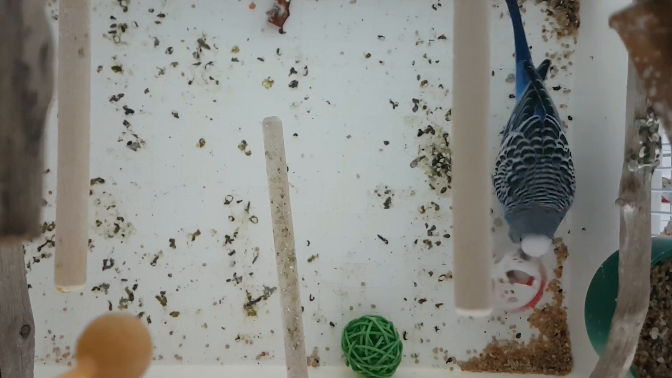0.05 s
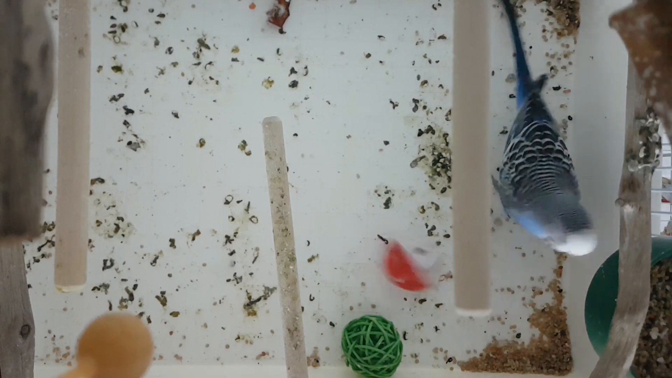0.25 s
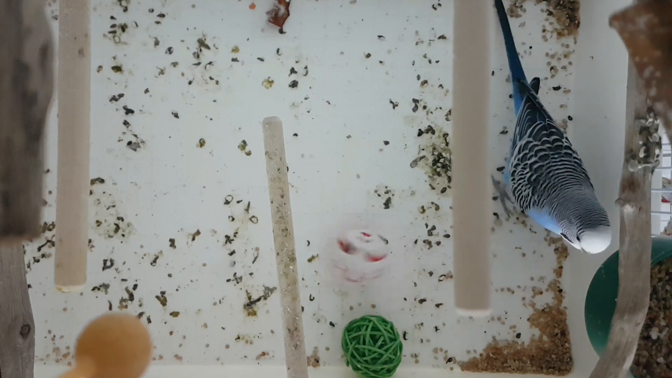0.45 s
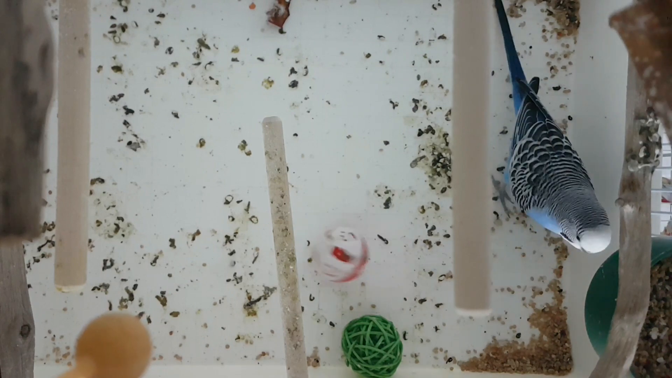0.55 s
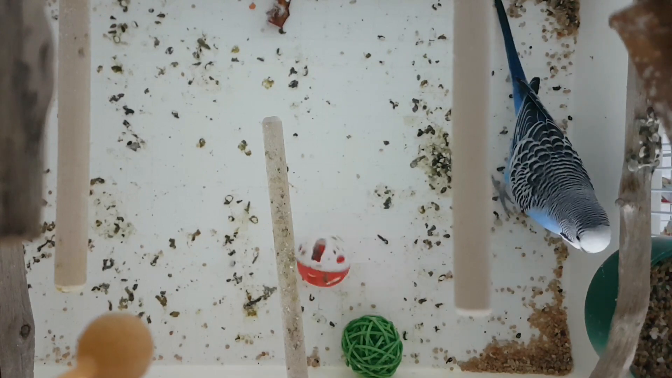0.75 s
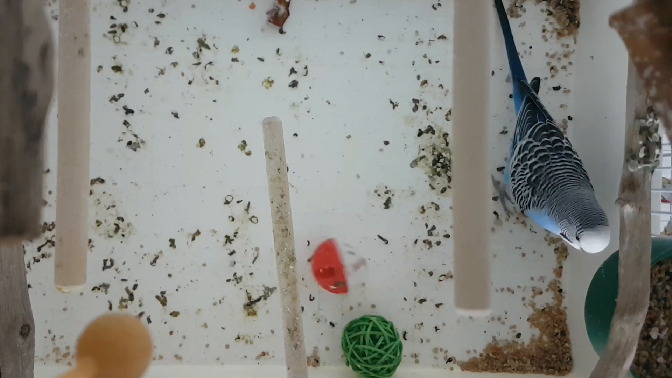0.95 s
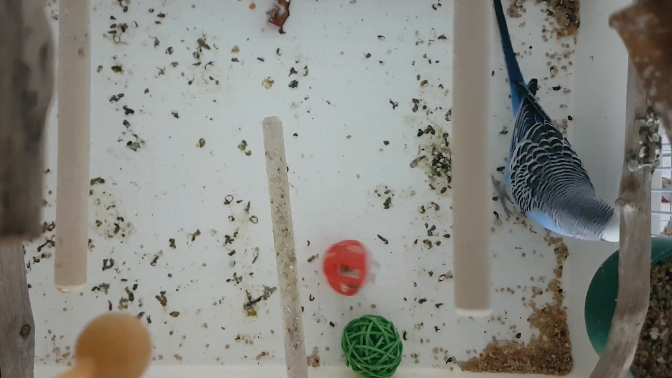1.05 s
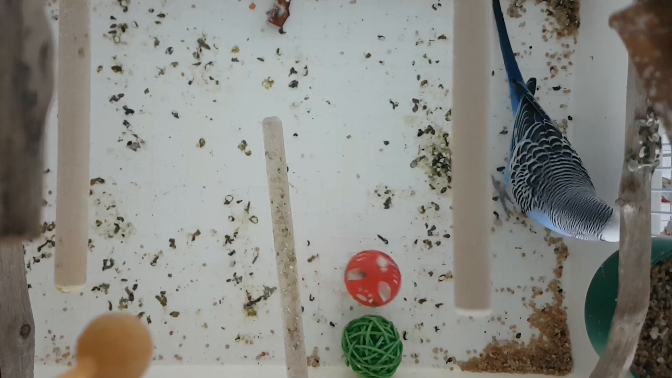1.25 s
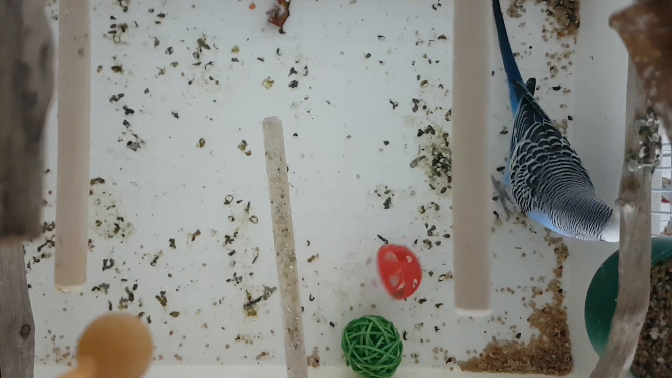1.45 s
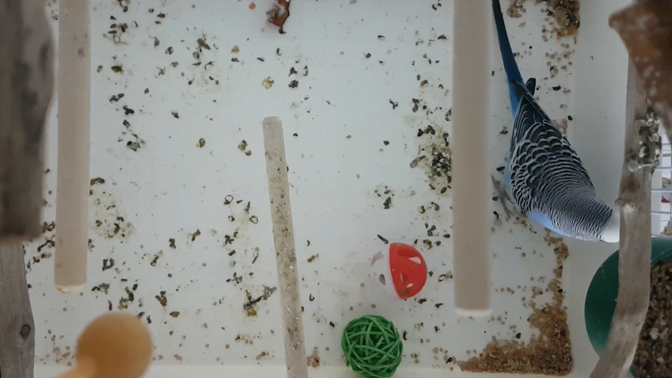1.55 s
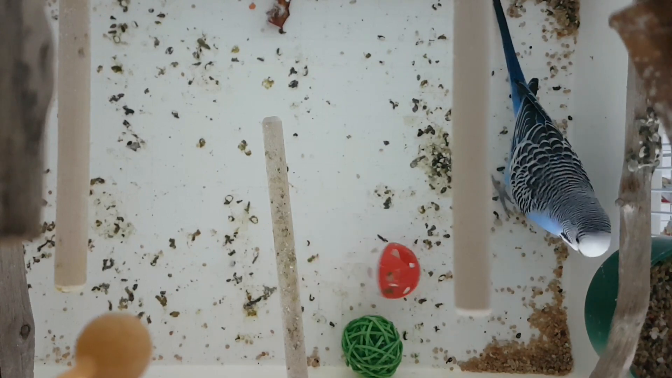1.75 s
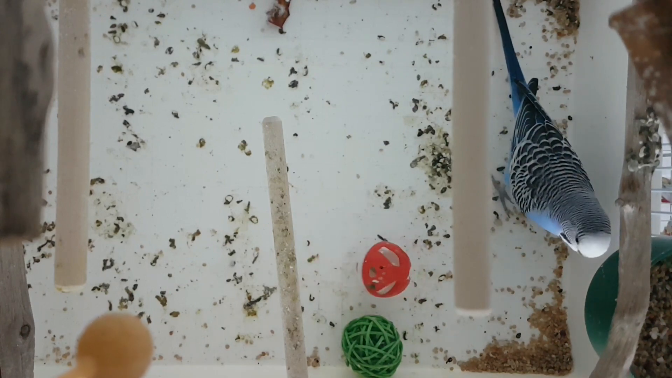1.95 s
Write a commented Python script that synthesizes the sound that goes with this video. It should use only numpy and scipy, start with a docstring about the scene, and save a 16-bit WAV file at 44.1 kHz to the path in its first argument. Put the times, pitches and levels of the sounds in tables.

```python
"""A budgie ends a warble amid scrabbling and flings a hollow plastic ball with a bell inside.
The notes are gliding sines with airy hiss; the bell's two modes give faint, flickering tinkles.
The ball lands on the cage tray, bounces and rolls over husks: clicks ring modes of tray, stand,
shell and husks, with grainy bursts, a dying rattle and fine ticks between the bumps.
A small room of decaying noise answers; a close microphone pair hears it a little from the right."""
import sys
import numpy as np
from scipy import signal
from scipy.fft import rfft, irfft, next_fast_len
from scipy.io import wavfile

SR = 44100
rng = np.random.default_rng(int(sys.argv[2]) if len(sys.argv) > 2 else 0)


def boost(x):
    """Linear amplitude factor 10**(x/20) for a level x in decibels (scalar or array-like)."""
    u = np.asarray(x, float) / 20
    return 10 ** u


def put_to_file(sound):
    """Save the sound as 16-bit audio at rate SR, in the file named by the first command-line argument."""
    columns = np.atleast_2d(sound).T  # one column per channel
    safe = np.clip(columns, -1, 1)
    whole_steps = np.round(safe * 32767)
    wavfile.write(sys.argv[1], SR, whole_steps.astype(np.int16))


N = 90405

# Low modes of the tray. Each row: frequency in Hz, relative level in dB, t60 in seconds.
TRAY_LOW_MODES = [(217, -15, 0.14), (297, -17, 0.1), (335, -17, 0.093), (355, -13, 0.14), (330, -3, 0.012),
                  (411, -27, 0.04), (474, -19, 0.11), (513, -17, 0.15), (609, -24, 0.06)]
# Upper modes of the tray. Each row: frequency in Hz, relative level in dB, t60 in seconds.
TRAY_HIGH_MODES = [(743, -19, 0.06), (780, -16, 0.07), (803, -12, 0.09), (943, -12, 0.07),
                   (1010, -12, 0.04), (1078, -11, 0.09), (1250, -18, 0.05), (1380, -17, 0.04),
                   (1650, -18, 0.02)]
# Modes of the ball's shell. Each row: frequency in Hz, relative level in dB, t60 in seconds when struck.
SHELL_MODES = [(1750, -9, 0.01), (2350, -1, 0.011), (2850, -4, 0.008), (3350, -6, 0.009),
               (5160, -15, 0.012)]
# Modes of the dry husks. Each row: frequency in Hz, relative level in dB, t60 in seconds when struck.
HUSK_MODES = [(7300, -13, .006), (8100, -11, .008), (10800, -12, .006), (12000, -12, .006),
              (14600, -4, .006), (15600, -3, .005)]


def at_hz(points, hz):
    """Read a spectrum on a log-frequency axis."""
    point_hz, value = np.transpose(points)
    return np.interp(np.log(np.maximum(hz, 1)), np.log(point_hz), value)


def rms_one(x):
    """Scale to unit rms."""
    return x / np.sqrt(np.mean(x ** 2) + 1e-20)


def band(x, low_hz, high_hz):
    """Band-pass."""
    return signal.sosfilt(signal.butter(2, [low_hz, high_hz], "band", fs=SR, output="sos"), x)


def steep(x, low_hz, high_hz):
    """Band-pass with steep skirts."""
    return band(band(x, low_hz, high_hz), low_hz, high_hz)


def waver(depth_db, rate_hz):
    """A gain that wanders at random: low-passed noise, in dB, of the given rms depth."""
    r = np.exp(-2 * np.pi * rate_hz / SR)
    drift = signal.lfilter([1], [1, -2 * r, r * r], rng.standard_normal(N + 4000))
    return boost(depth_db * rms_one(drift[4000:]))


def clicks(s, gains):
    """An impulse train over a tiny offset."""
    out = np.full(N, 1e-18)
    np.add.at(out, np.clip((np.asarray(s) * SR).astype(int), 0, N - 1), gains)
    return out


def grains(rate, size_db):
    """Random clicks, so many per second, of uneven size and sign."""
    happens = rng.random(N) < rate / SR
    size = boost(size_db * np.minimum(rng.exponential(1, N), 4))
    return happens * size * rng.choice([-1, 1], N) + 1e-18


def ring(x, hz, t60):
    """A two-pole resonator: a unit click sets a dying sine of about unit height ringing."""
    r, w = boost(-60 / (t60 * SR)), 2 * np.pi * hz / SR
    return signal.lfilter([0, np.sin(w)], [1, -2 * r * np.cos(w), r * r], x)


def strike(s, db, modes, spread_db, tilt_db=0):
    """Every blow rings every mode, each with a strength of its own; the surface first moves away."""
    luck = rng.standard_normal((len(s), len(modes)))
    out = np.zeros(N)
    for k, (hz, level, t60) in enumerate(modes):
        strength_db = db + level + spread_db * luck[:, k] + tilt_db * np.log2(hz / 350)
        out += ring(clicks(s, -boost(strength_db)), hz, t60)
    return out


def burst(s, db, low_hz, high_hz, t60, rate):
    """Grainy noise that dies away after each blow."""
    decay = signal.lfilter([1], [1, -boost(-60 / (t60 * SR))], clicks(s, boost(db)))
    return steep(rms_one(grains(rate, 4.9)) * decay, low_hz, high_hz)


def stereo_bands(shape):
    """Half-octave bands of stereo noise, the last one narrower, each shaped by shape(Hz)."""
    # Likeness of left and right. Each row: frequency in Hz, correlation (1 = identical).
    likeness = [(100, 0.85), (300, 0.8), (600, 0.5), (1100, 0.05), (3000, 0.07), (12000, 0.1)]
    edges = np.append(22 * 2 ** np.arange(0, 10, .5), 19000)
    white = rng.standard_normal((2, 2, N))
    out = 0
    for k, (low, high) in enumerate(zip(edges[:-1], edges[1:])):
        mid, side = band(white[k % 2], low, high)  # neighbouring bands use separate noise
        hz = np.sqrt(low * high)
        alike = at_hz(likeness, hz)
        pair = np.sqrt(1 + alike) * mid + np.sqrt(1 - alike) * side * [[1], [-1]]
        out = out + shape(hz) * pair
    return out


def room_tone():
    """Steady stereo noise with a spectrum that falls towards the treble."""
    # Spectrum of the tone. Each row: frequency in Hz, relative level per Hz in dB.
    spectrum = [(15, -40), (40, 0.5), (161, -1), (229, -1.5), (591, -9), (2110, -14.5), (2760, -25),
                (3720, -26.5), (16000, -42)]
    return boost(-56) * rms_one(stereo_bands(lambda hz: boost(at_hz(spectrum, hz))))


def warble():
    """Short gliding whistles with faint overtones and an unsteady level."""
    # Notes of the warble. Each row: start in seconds, length in seconds, first pitch in Hz,
    # last pitch in Hz, relative level in dB.
    notes = [(0.0, 0.0068, 1659, 1640, -32.5), (0.0, 0.026, 1220, 1348, -38),
             (.008, 0.023, 2112, 2081, -25), (0.019, 0.027, 2085, 2040, -31),
             (0.026, 0.029, 3560, 3385, -42), (0.044, 0.011, 2860, 2530, -32),
             (0.051, 0.016, 2354, 2083, -32.5), (0.058, 0.015, 2530, 2656, -37),
             (0.062, 0.0231, 1420, 1338, -29), (0.076, 0.016, 2893, 2700, -42.5),
             (0.084, 0.014, 982, 1100, -32), (.086, 0.0098, 2060, 2055, -37),
             (0.112, 0.015, 1130, 1110, -41)]
    # Overtones from the second harmonic up. Each entry: level against the fundamental in dB.
    overtone_db = [-31, -33, -35, -38]
    edge_s = 0.0019  # fade at both ends of a note
    flutter = [waver(5, 60) for _ in overtone_db]
    out, t = np.zeros(N), np.arange(N) / SR
    for s, length, hz0, hz1, db in notes:
        u = np.clip((t - s) / length, 0, 1)
        phase = 2 * np.pi * np.cumsum(hz0 + (hz1 - hz0) * u) / SR
        tone = np.sin(phase)
        for k, level in enumerate(overtone_db):
            tone += boost(level) * flutter[k] * np.sin((k + 2) * phase)
        fade = np.clip(np.minimum(u, 1 - u) * length / edge_s, 0, 1)
        out += boost(db) * np.sin(np.pi / 2 * fade) * tone
    return out * waver(2.0, 160)


def breath():
    """Air hissing through the bird's throat: wavering band-passed noise."""
    # Airy hiss in the warble. Each row: time in seconds, relative level in dB.
    hiss_level = [(.0, -70), (.04, -70), (.052, -63), (.095, -64), (.12, -74), (.2, -90)]
    s, db = np.transpose(hiss_level)
    level = boost(np.interp(np.arange(N) / SR, s, db, right=-120))
    hiss = rms_one(band(rng.standard_normal(N), 4000, 9500))
    return level * hiss * waver(6.5, 120)


def rolling():
    """Small ticks shake the tray while husks rustle under claws and ball."""
    # Scrabbling and rolling. Each row: time in seconds, tray rumble in relative dB,
    # husk rustle in relative dB.
    motion = [(0.0, -35.5, -66), (0.14, -71, -79), (0.258, -92, -124), (0.379, -32.5, -68),
              (0.49, -45, -77.5), (0.632, -46.5, -77), (0.72, -51, -76), (0.869, -60, -94),
              (1.07, -59, -82), (1.161, -45.5, -80.5), (1.46, -86, -83.5), (1.6, -50.5, -83),
              (1.79, -59, -82.5), (1.95, -48.5, -83.5), (2.05, -54, -86)]
    rumble_gain_db, rustle_gain_db = -4, 16.5
    s, rumble, rustle = np.transpose(motion)
    t = np.arange(N) / SR
    tray = sum(boost(db) * ring(grains(250, 10.0), hz, t60)
               for hz, db, t60 in TRAY_LOW_MODES + TRAY_HIGH_MODES)
    tray = rms_one(band(tray, 125.72, 2300))
    # in the rustle every shell and husk mode is damped to a t60 of 2 ms
    husks = rms_one(sum(boost(db) * ring(grains(2800, 3.5), hz, 0.002)
                        for hz, db, _ in SHELL_MODES + HUSK_MODES))
    rumble_level = boost(np.interp(t, s, rumble) + rumble_gain_db)
    rustle_level = boost(np.interp(t, s, rustle) + rustle_gain_db)
    return rumble_level * tray + rustle_level * husks


def bell():
    """Faint, flickering tinkles from inside the ball: each touch rings two modes."""
    # Touches of the clapper. Each row: time in seconds, low mode in relative dB,
    # high mode in relative dB.
    touches = [(.1, -48, -85), (.165, -83, -60.5), (.335, -62, -39.5), (0.37, -38, -66), (.40, -58, -60),
               (.44, -57, -64), (.535, -58, -82), (.675, -45, -70), (.705, -57, -74), (0.907, -42, -64),
               (0.926, -48.5, -56), (1.214, -49.5, -92), (1.257, -57, -58.5), (1.526, -84, -52.5)]
    # Modes of the bell. Each row: frequency in Hz, relative level in dB, t60 in seconds.
    bell_modes = [(4810, -5, .2), (10850, 0, .09)]
    s, *levels = np.transpose(touches)
    out = np.zeros(N)
    for db, mode in zip(levels, bell_modes):
        tone = band(strike(s, db, [mode], 0.54), mode[0] * .95, mode[0] * 1.05)
        out += tone * waver(4, 68)
    return out


def bumps():
    """Each bump rings tray, stand, shell and husks, with short rough bursts and a dying rattle."""
    # Bumps of the ball on the tray. Each row: time in seconds, then relative dB of the thud,
    # the knock, the shell clack and the husk crackle.
    blows = [(0.2082, -1.5, -4.5, -15.5, -17.5), (0.2117, -7, -9.5, -19.5, -16),
             (0.23, -61, -16.5, -96, -55), (0.251, -22, -40, -30, -21), (0.2594, -3.5, -11.5, -28, -52),
             (0.2635, -12, -18.5, -24, -18.5), (0.286, -27, -24, -44, -45), (0.305, -21, -20, -50, -55),
             (0.334, -19.5, -35.0, -44, -38), (0.355, -22, -28.5, -55, -36),
             (0.373, -20.5, -53, -39.5, -35.5), (0.399, -20, -46, -62, -40),
             (0.427, -29, -33.5, -38.5, -37.5), (0.445, -24.5, -48, -48, -53),
             (0.461, -24.5, -53, -48, -59), (0.484, -33, -56, -57, -59.0), (0.512, -20.5, -33, -41.5, -43),
             (0.53, -31, -60, -57, -50), (0.55, -33, -38.5, -62, -64), (0.589, -26.5, -51, -61.0, -75),
             (0.645, -33, -55, -48, -77), (0.65, -65, -37, -49, -53), (0.662, -32, -35, -48, -52),
             (0.674, -21.5, -32.5, -33, -34), (0.702, -29.5, -38, -28, -31), (0.721, -54, -39.5, -69, -70),
             (0.769, -39.5, -44, -44, -44), (0.797, -53, -73, -50, -53), (0.855, -34.5, -49.5, -54, -59),
             (0.886, -32, -28, -41.5, -35), (0.905, -37.5, -34, -53, -62.5), (0.922, -40, -35, -45, -41.5),
             (1.049, -29, -29, -41, -39), (1.088, -32, -38, -51.5, -79), (1.163, -33.5, -76, -63, -84),
             (1.208, -39.5, -45.5, -53, -60), (1.247, -44.5, -49.5, -60, -52), (1.391, -32, -50, -65, -69),
             (1.397, -67, -54.0, -55, -61), (1.446, -35, -64, -75, -67), (1.484, -34, -30.5, -35, -62),
             (1.493, -33, -52, -46, -41.5), (1.507, -33, -45, -60, -39.5), (1.516, -27.5, -35, -55, -73),
             (1.521, -53, -46, -46, -44), (1.539, -63, -48, -45.5, -70), (1.547, -39.5, -47, -54, -63),
             (1.57, -33, -43, -63, -57), (1.587, -37.5, -40, -46, -48), (1.591, -33.5, -53, -55, -58),
             (1.66, -38, -39.5, -63, -76), (1.727, -31, -49, -84, -68), (1.789, -38, -38, -56.5, -76),
             (1.808, -65, -49, -59, -73), (1.838, -39, -60, -73, -74), (1.872, -58, -55, -70, -76.5),
             (1.895, -45.5, -66, -68, -79), (1.914, -41, -42.5, -54.5, -83),
             (1.929, -40.5, -34, -45, -51.5), (1.97, -43, -46.5, -61, -73.0)]
    # Where the ball is on the tray favours high or low modes. Each row: time in seconds,
    # tilt in dB per octave about 350 Hz.
    place = [(.2, -6), (.35, 9.5), (.55, -1), (.7, -3), (.9, -1), (1.05, 22), (1.2, -4), (1.39, 10),
             (1.445, 18), (1.52, -6), (1.66, -17.5), (1.73, 5), (1.84, 22), (2.0, 10)]
    # Deep modes of the cage stand, shaken by the thuds. Each row: frequency in Hz,
    # relative level in dB, t60 in seconds.
    stand_modes = [(58.3, -34.5, 0.306), (114.6, -19.5, 0.064)]
    tray_spread_db, light_spread_db = 3.5, 3
    crack_t60, rattle_t60 = 0.04, 0.13  # seconds
    rattle_rate = 600  # grains per second
    s, thud, knock, clack, crackle = np.transpose(blows)
    tilt = np.interp(s, *np.transpose(place))

    tray = steep(strike(s, thud, TRAY_LOW_MODES, tray_spread_db, tilt), 179.6, 668)
    tray += steep(strike(s, knock, TRAY_HIGH_MODES, tray_spread_db), 400, 2130)
    stand = band(strike(s, thud, stand_modes, tray_spread_db), 51.0, 213)
    shell = steep(strike(s, clack, SHELL_MODES, light_spread_db), 1560, 7000)
    shell += burst(s, clack + 6, 990, 5400, crack_t60, 4400)
    husks = band(strike(s, crackle, HUSK_MODES, light_spread_db), 4600, 16000)
    husks += burst(s, crackle + 1.5, 5260, 14100, crack_t60, 5000)
    # loose bits chatter on after each bump: a low and a high part
    rattle = burst(s, knock + 0.5, 670, 1394, rattle_t60, rattle_rate)
    rattle += burst(s, clack - 6, 1100, 4580, rattle_t60, rattle_rate)
    return tray + stand + shell + husks + rattle


def direct(x):
    """Level and phase differ between the two microphones, by frequency."""
    # Level of left over right. Each row: frequency in Hz, difference in dB.
    left_minus_right = [(60, -1), (240, -2.3), (480, -2.1), (950, -5), (1890, -4.5), (3770, -5.5),
                        (7520, 0.5), (14000, -4.5)]
    # Phase lead of left over right. Each row: frequency in Hz, lead in radians.
    left_lead = [(60, -0.3), (300, -0.3), (1000, -1.6), (2000, -1.1), (3800, -2.0), (6000, -1.5),
                 (9900, -1.9), (14000, -1.6)]
    size = next_fast_len(N + 512)
    hz = np.arange(size // 2 + 1) * SR / size
    half = boost(at_hz(left_minus_right, hz) / 2) * np.exp(.5j * at_hz(left_lead, hz))
    return irfft(rfft(x, size) * [half, 1 / half], size)[:, :N]


def room(x):
    """Reverberation: noise dying away band by band, after a short gap."""
    # Decay of the room. Each row: frequency in Hz, t60 in seconds.
    decay_times = [(100, 0.32), (400, 0.21), (1500, 0.28), (5000, 0.41), (14000, 0.21)]
    # Colour of the room. Each row: frequency in Hz, relative level in dB.
    colour = [(100, -1), (400, -0.5), (1500, -4), (5000, -2.5), (14000, -9)]
    t = np.arange(N) / SR - 0.00937  # seconds after the gap

    def decay(hz):
        """Envelope of one band; longer tails start softer."""
        t60 = at_hz(decay_times, hz)
        return (t > 0) * boost(at_hz(colour, hz) - 60 * np.maximum(t, 0) / t60) / np.sqrt(t60)

    tail = stereo_bands(decay)[:, :SR] / np.sqrt(SR / 14)
    return signal.fftconvolve(x[None], tail, axes=1)[:, :N]


def scene():
    """Bird, ball and bell in the room, over the room tone."""
    air = room_tone()
    bird = warble() + breath()
    ball = rolling() + bell() + bumps()
    reverb = room(boost(-6) * bird + boost(-6.5) * ball)
    reverb = reverb * boost([[-1.2], [1.2]])  # the room, too, leans right
    return direct(bird + ball) + reverb + air


def top_cut(x):
    """Nothing passes above the cut-off."""
    return signal.sosfilt(signal.butter(12, 16620, fs=SR, output="sos"), x)


def record(dry):
    """The microphones lose the deepest bass and the very top; peaks are softly rounded."""
    cut = signal.sosfilt(signal.butter(2, 49.4, "high", fs=SR, output="sos"), dry)
    cut = signal.sosfilt(signal.cheby2(10, 30, 16400, fs=SR, output="sos"), cut)
    mix = 1.243 * np.tanh(cut / 1.784)
    return top_cut(mix)


dry = scene()
out = record(dry)
put_to_file(out)
```